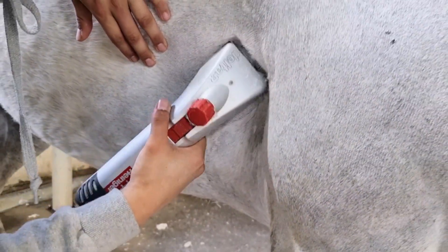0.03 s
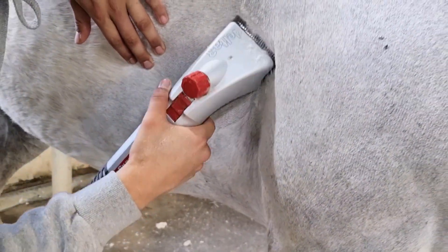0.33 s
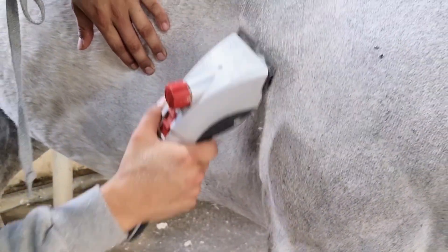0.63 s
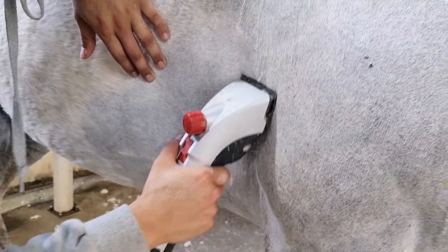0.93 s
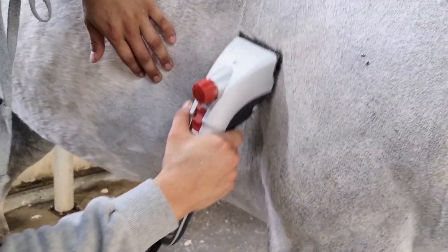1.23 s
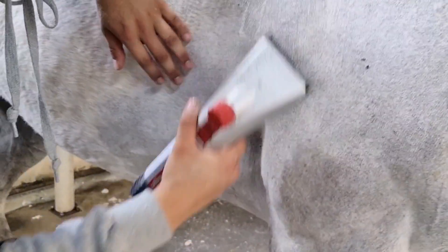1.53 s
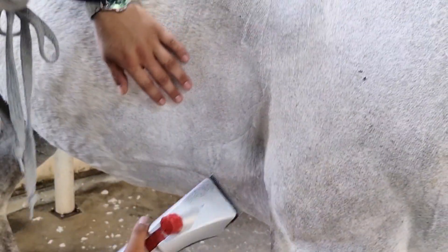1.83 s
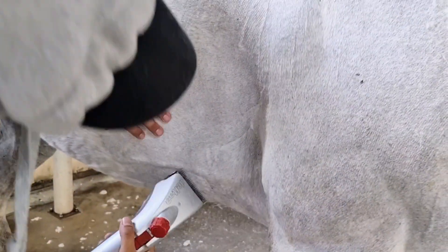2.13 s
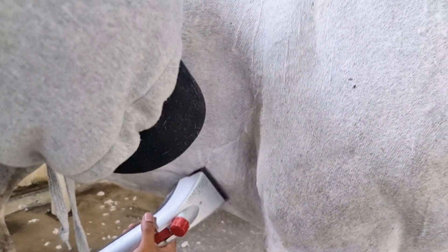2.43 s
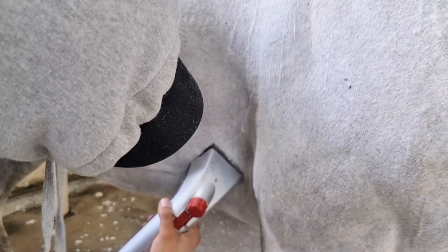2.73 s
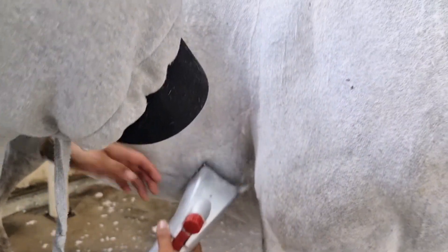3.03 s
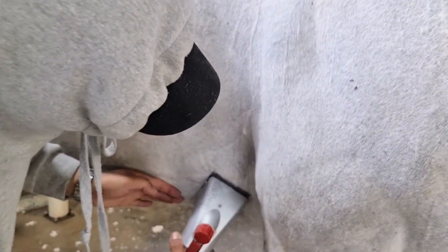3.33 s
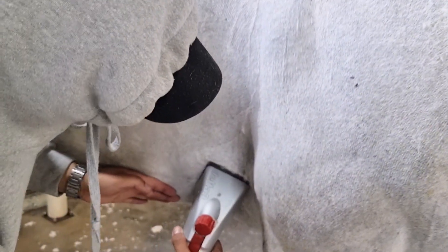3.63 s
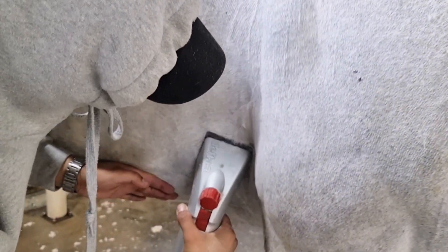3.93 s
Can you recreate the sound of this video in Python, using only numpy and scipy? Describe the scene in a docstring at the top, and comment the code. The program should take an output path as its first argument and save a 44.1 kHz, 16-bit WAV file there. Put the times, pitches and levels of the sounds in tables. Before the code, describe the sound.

Close up in a stable, an electric clipper runs steadily over a horse, with a whining motor, fast blade ticking and a dry rasp of hair. It softens briefly midway, then builds again above a faint low hum.

```python
"""A heavy electric clipper runs over a horse's coat, close by, in a stable.
Its motor drives a crank through a gear: the teeth whine, swelling with each stroke of the blade.
The blade ticks at both ends of its travel, rattles the housing and rasps through the hair.
Under it lie a low hum and the rumble of the stable."""
import sys
import numpy as np
from scipy import signal
from scipy.fft import rfft, irfft
from scipy.io import wavfile
from scipy.ndimage import uniform_filter1d, map_coordinates

SR = 44100
rng = np.random.default_rng(int(sys.argv[2]) if len(sys.argv) > 2 else 0)


def bounce(signal):
    """Save signal as a 16-bit WAV file at the path given by the first command-line argument."""
    frames = np.transpose(np.atleast_2d(signal))
    limited = np.clip(frames, -1, 1)
    pcm = np.round(limited * 32767).astype(np.int16)
    wavfile.write(sys.argv[1], SR, pcm)


N = 176400
T = np.arange(N) / SR

# crank: t/s, speed/(turn/s)
CRANK_SPEED = [(0.0, 32.8635), (0.25, 32.9426), (0.5, 32.9797), (0.75, 33.0376), (1.0, 33.1605),
               (1.25, 33.1716), (1.5, 33.2096), (1.75, 33.2922), (2.0, 33.2281), (2.25, 33.4112),
               (2.5, 33.5341), (2.75, 33.4914), (3.0, 33.391), (3.25, 33.3876), (3.5, 33.3066),
               (3.75, 33.1755), (4.0, 33.1238)]
# blade in the coat: t/s, rasp/dB, housing buzz/dB
CUTTING = [(0, -36.5, -43), (.66, -36, -43), (.73, -39.5, -39.5), (2.1, -38, -45), (2.2, -42.5, -48.5),
           (3.03, -37.5, -45.5), (3.18, -41, -45), (4, -39, -43)]


def amp(db):
    return 10 ** (np.asarray(db) / 20)


def unit(x):
    return x / np.sqrt(np.mean(x ** 2) + 1e-20)


def curve(rows, col=1):
    """Table column, linear in time."""
    rows = np.array(rows)
    return np.interp(T, rows[:, 0], rows[:, col])


def during(start_s, end_s, fade_s=0.033):
    """Gate with linear fades."""
    return np.clip(np.minimum(T - start_s, end_s - T) / fade_s, 0, 1)


def colour(x, spectrum):
    """Filter by rows of f/Hz, gain/dB."""
    points_hz, db = np.transpose(spectrum)
    hz = np.fft.rfftfreq(N, 1 / SR)
    return irfft(rfft(x) * amp(np.interp(np.log(hz + 1), np.log(points_hz), db)), N)


def drift(rate_hz):
    """Low-passed noise, rms 1."""
    hz = np.fft.rfftfreq(N, 1 / SR)
    return unit(irfft(rfft(rng.standard_normal(N)) * np.exp(-(hz / rate_hz) ** 2) * (hz > 0), N))


def pair(x, alike):
    """Mix two independent channels to correlation `alike`."""
    angle = np.arcsin(alike) / 2
    return np.cos(angle) * x + np.sin(angle) * x[::-1]


def scrape(turn, rough, alike, tracks=9, size=1300):
    """Friction repeating each turn, changing as the hand moves; `rough` is the share of fresh noise."""
    cyclic = np.zeros((2, N))
    for k in range(tracks):
        away = T / T[-1] * (tracks - 1) - k
        near = abs(away) < 1
        for side in cyclic:
            track = rng.standard_normal(size)
            friction = map_coordinates(track, [turn[near] % 1 * size], order=3, mode="grid-wrap")
            side[near] += np.cos(away[near] * np.pi / 2) * friction
    return pair(np.sqrt(1 - rough) * unit(cyclic) + np.sqrt(rough) * rng.standard_normal((2, N)), alike)


def nearby(x, echo_db, sway_s, right_lag_s=0.00005):
    """Direct sound plus echoes off flank and arm, shifting as the clipper moves; rms held at 1."""
    out = np.array([x, np.interp(T - right_lag_s, T, x)])
    for side in out:
        for path_s in np.linspace(.0012, .005, 3):
            delay_s = path_s * rng.uniform(.8, 1.207) + sway_s * drift(1.21)
            side += amp(echo_db) * np.interp(T - delay_s, T, x)
    return out / np.sqrt(uniform_filter1d((out ** 2).mean(0), size=5300))


def turning(x, echo, path_s):
    """A short moving echo shifts the colour as the clipper turns in the hand."""
    echoes = [np.interp(T - path_s * np.exp(0.297 * drift(0.895)), T, side) for side in x]
    return unit(x + echo * np.array(echoes))


def gear(turn, teeth=35, load_rise_turns=0.047, wind_up_teeth_per_turn=0.2):
    """The tooth tone swells under each stroke and slips through its play when the load reverses."""
    # push, rebound, return, coast: start/turn, length/turn, level/dB, share of play, share of swell
    strokes = [(0.361, 0.3465, 0, 0.9, 0.9), (0.7244, 0.069, 0.5, -0.56, 0.31),
               (0.801, 0.32, -0.5, -0.074, 0.16), (0.2065, 0.13, -10, 0.095, 0)]
    # t/s, play/teeth, swell/dB
    loading = [(0, 0.22, 8.5), (.6, 0.19, -7), (1.5, 0.21, 13.5), (1.95, 0.31, -8), (2.35, 0.39, -3.5),
               (2.8, 0.41, 11), (3.2, 0.41, 14), (3.7, 0.38, 12), (4, 0.34, 4)]
    # t/s, main level/dB, left minus right/dB, upper level/dB, gain of main's high side/dB
    whine = [(0, -27, 8, -33, -3), (.55, -20.5, 2.5, -31, 0), (.95, -25.5, 4, -34, -1),
             (1.1, -23, 2.5, -38, -2.5), (1.53, -21.5, -0.5, -33, -3.5), (1.66, -26, -2, -35.5, -3.5),
             (1.78, -27, 8.5, -37, -2), (1.9, -26.5, -4, -41, -2), (2.0, -31, 0, -54, -9),
             (2.16, -28, 5.5, -53, -1), (2.32, -30, 4, -36, 4), (2.86, -27.5, -9.5, -42, -3),
             (3.32, -26, 3.5, -36, 4.5), (3.64, -23.5, 1.5, -35.5, 0), (4, -21.5, 1, -37, 0.5)]
    # second harmonic: t/s, level/dB
    octave_level = [(.2, -46), (.48, -39), (.81, -52.5), (.87, -36), (1.2, -42.5), (1.88, -35.5),
                    (1.98, -40.5), (2.8, -34.5), (2.98, -44), (3.16, -42), (3.23, -32.5), (3.9, -35.5),
                    (4, -40)]
    # housing resonances: f/Hz, gain/dB
    main_resonance = [(300, -41), (600, -8.5), (880, -10.5), (1020, -9), (1100, 0.5), (1200, -0.5),
                      (1250, -7), (1320, -23)]
    upper_resonance = [(1200, -36), (1280, -7.5), (1330, 2.5), (1400, 1), (1470, -8.5), (2000, -15.5),
                       (3000, -30)]

    play_teeth, swell_db = curve(loading), curve(loading, col=2)
    mesh = teeth * turn + 0.023 * drift(163)
    tone, load = np.zeros(N), np.zeros(N)
    for start, length, db, play_share, swell_share in strokes:
        from_mid = (turn - start - length / 2 + .5) % 1 - .5
        gate = .5 + .5 * np.sin(np.pi * np.clip((length / 2 - abs(from_mid)) / load_rise_turns, -.5, .5))
        grip = gate * amp(db + swell_share * swell_db * from_mid / length + .5 * drift(20))
        lag_teeth = play_share * play_teeth + wind_up_teeth_per_turn * from_mid
        tone += grip * np.sin(2 * np.pi * (mesh - lag_teeth))
        load += grip
    main = colour(tone, main_resonance)
    low_side = colour(main, [(1140, -0.5), (1180, -25)])
    main = low_side + (main - low_side) * amp(curve(whine, col=4))
    pan_db = curve(whine, col=2) * np.array([[.5], [-.5]])
    out = nearby(main, echo_db=-12.5, sway_s=.0002) * amp(curve(whine) + 0.95 + pan_db)
    upper = colour(tone, upper_resonance)
    out += nearby(upper, echo_db=-12, sway_s=.00024) * amp(curve(whine, col=3) + 1.8)
    octave = (1.7 + load) * np.sin(4 * np.pi * mesh + 0.39 * drift(47))
    return out + nearby(octave, echo_db=-9.5, sway_s=.0001) * amp(curve(octave_level) + 2.5)


def reversals(turn, rise_s=0.00036, shake_s=0.0062):
    """Each blade reversal clacks and ticks, one also knocks the housing. Returns sound, shake envelope."""
    # ends of travel: position/turn, clack/dB, tick/dB, decay/s
    ends = [(.698, -1.5, -0.5, 0.0014), (0.2155, 5, -4, 0.00075)]
    # t/s, knock/dB, clack/dB, tick/dB
    levels = [(.36, -36, -40, -39.5), (.6, -41, -45, -44), (.75, -43, -42.5, -43), (2.1, -52, -43, -43.5),
              (2.4, -43, -59, -52), (3.02, -41.5, -47, -38), (3.26, -44.5, -51, -47),
              (3.55, -42, -40.5, -42.5)]
    # housing modes: f/Hz, level/dB, decay/s
    modes = [(1426, -1.5, 0.0048), (1668, -2.5, 0.0067), (1814, 0, 0.0042)]
    # f/Hz, gain/dB
    clack_spectrum = [(1200, -18), (1700, 3.5), (3800, 0), (5500, -24.5)]
    tick_spectrum = [(300, -37), (800, -0.5), (4000, -9.5), (6000, 0.5), (11000, -6), (15500, -7.5)]

    clack_env, tick_env, knock, shake = np.zeros(N), np.zeros(N), np.zeros(N), np.ones(N)
    ages_s = [(turn - at + 0.00093 * drift(30)) % 1 / curve(CRANK_SPEED) for at, *_ in ends]
    for age_s, (_, clack_db, tick_db, decay_s) in zip(ages_s, ends):
        rise = 1 - np.exp(-age_s / rise_s)
        clack_env += rise * amp(clack_db) * np.exp(-age_s / decay_s)
        tick_env += rise * amp(tick_db) * np.exp(-age_s / decay_s)
        shake += rise * amp(2 * tick_db) * np.exp(-age_s / shake_s)
    for hz, db, decay_s in modes:  # neighbouring modes swing opposite ways
        knock = amp(db) * np.exp(-ages_s[0] / decay_s) * np.sin(2 * np.pi * hz * ages_s[0]) - knock
    out = nearby(knock, echo_db=-10, sway_s=.0001) * amp(curve(levels))
    clack = colour(clack_env * scrape(turn, rough=.19, alike=.24), clack_spectrum)
    tick = colour(tick_env * scrape(turn, rough=.25, alike=.1), tick_spectrum)
    out += unit(clack) * amp(curve(levels, col=2))
    out += unit(tick) * amp(curve(levels, col=3))
    return out, shake


def housing(turn, shake):
    """The housing buzzes and rattles, hardest just after a reversal."""
    # f/Hz, gain/dB
    buzz_spectrum = [(100, -24), (230, -13), (420, -12), (500, -2), (680, 4), (1000, -2), (1500, -36)]
    rattle_spectrum = [(900, -19), (1300, -3), (2400, -1.5), (3500, -9.5), (8000, -47)]

    buzz = colour(scrape(turn, rough=.45, alike=.53) * shake, buzz_spectrum)
    rattle = colour(scrape(turn, rough=.22, alike=.13) * shake, rattle_spectrum)
    rattle = turning(rattle, echo=.67, path_s=.00201)
    return unit(buzz) * amp(curve(CUTTING, col=2)) + rattle * amp(-35.5)


def hair(turn, shake):
    """The blade rasps through hair; its resonances open as it tilts against the coat."""
    # f/Hz, gain/dB
    rasp_spectrum = [(1900, -30), (2600, 0.5), (3500, 7), (5750, 3), (7300, -6.5), (15200, -6)]
    # blade resonances: start/s, end/s, f/Hz, level/dB
    rings = [(-.1, .4, 5880, -49.5), (1.34, 1.55, 4660, -48), (3.484, 4.1, 8170, -50)]

    friction = scrape(turn, rough=.47, alike=.1) * amp(2 * drift(460)) * shake
    rasp = turning(colour(friction, rasp_spectrum), echo=.4, path_s=.00069)
    low = colour(rasp, [(6000, 1), (8500, -33)])
    rasp_db = curve(CUTTING)
    treble_db = -41 + .35 * (rasp_db - rasp_db.mean())
    out = low * amp(rasp_db) + unit(rasp - low) * amp(treble_db)
    for start_s, end_s, hz, db in rings:
        ring = colour(friction, [(hz / 1.14, -30), (hz, 0), (hz * 1.06, -30)])
        out += amp(db) * during(start_s, end_s) * unit(ring)
    return out


def hum(turn, motor_ratio=5):
    """Motor imbalance and a steady low hum."""
    # f/Hz, rms level/dB
    partials = [(55.7, -52.5), (111.3, -59)]

    out = amp(-59) * np.sin(2 * np.pi * motor_ratio * turn + 0.47 * drift(5.3))
    for hz, db in partials:
        out += amp(db + 1.7 * drift(3.4)) * np.sin(2 * np.pi * hz * T + 0.18 * drift(4))
    return np.sqrt(2) * out


def stable_rumble():
    """Low room noise, alike in both channels."""
    # f/Hz, gain/dB
    spectrum = [(20, -6.5), (28, 2.5), (40, -12), (82, 1.5), (115, -10.5), (200, -6.5), (450, -14.5),
                (1500, -26.5)]

    return amp(-50.5) * unit(colour(pair(rng.standard_normal((2, N)), alike=1), spectrum))


def stable_echo(x, t60_s=0.15, gap_s=0.006, size=13000):
    """Short tail of sparse room reflections."""
    t = np.arange(size) / SR
    reflections = rng.standard_normal((2, size)) * (rng.random((2, size)) < .05)
    tail = reflections * amp(-60 * t / t60_s) * (t > gap_s)
    tail /= np.linalg.norm(tail, axis=1, keepdims=True)
    return signal.fftconvolve(x, tail, axes=1)[:, :N]


def whistles(turn):
    """Thin tones of motor and gear come and go at multiples of the crank speed."""
    # start/s, end/s, multiple, level/dB
    tones = [(3.23, 3.6, 50, -46), (.7, 4.4, 56, -55), (.85, 2.4, 105, -50), (2.28, 3, 112, -50),
             (2.28, 3.9, 140, -49), (2.28, 3.05, 168, -47.5)]

    out = np.zeros((2, N))
    for start_s, end_s, multiple, db in tones:
        tone = np.sin(2 * np.pi * multiple * turn + 0.42 * drift(40))
        out += amp(db) * during(start_s, end_s) * nearby(tone, echo_db=-2, sway_s=.0001)
    return out


def scene(right_lag_s=0.000045):
    """All clipper sounds follow one crank angle; the clipper is slightly left of centre."""
    turn = np.cumsum(curve(CRANK_SPEED)) / SR
    drive = gear(turn) + whistles(turn)
    chatter, shake = reversals(turn)
    blade = chatter + housing(turn, shake) + hair(turn, shake)
    left, right = drive + blade * amp([[.4], [-.4]])
    right = np.pad(right, (round(right_lag_s * SR), 0))[:N]
    clipper = np.array([left, right])
    return clipper + amp(-19) * stable_echo(clipper) + hum(turn) + stable_rumble()


def record(dry, cutoff_hz=15950):
    """Steep low-pass."""
    taps = signal.firwin(511, cutoff_hz, window=("kaiser", 9), fs=SR)
    return signal.oaconvolve(dry, taps[None], "same")


dry = scene()
out = record(dry)
bounce(out)
```